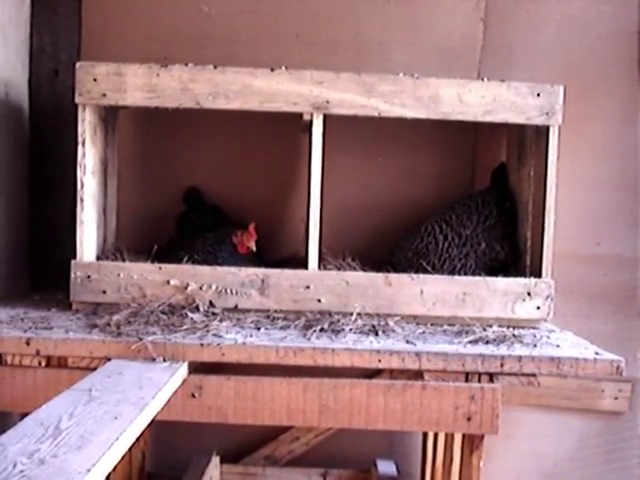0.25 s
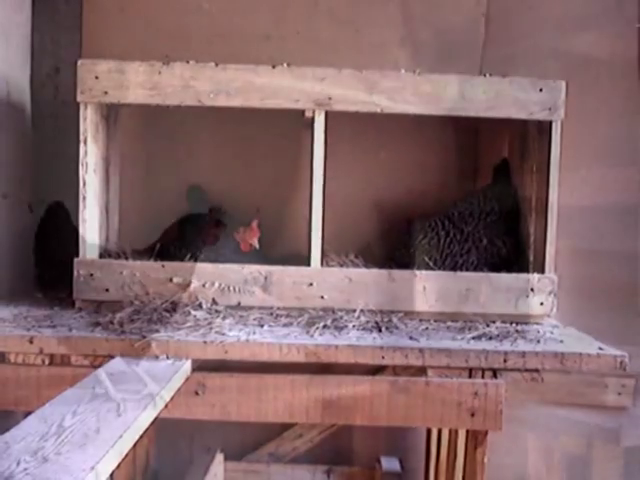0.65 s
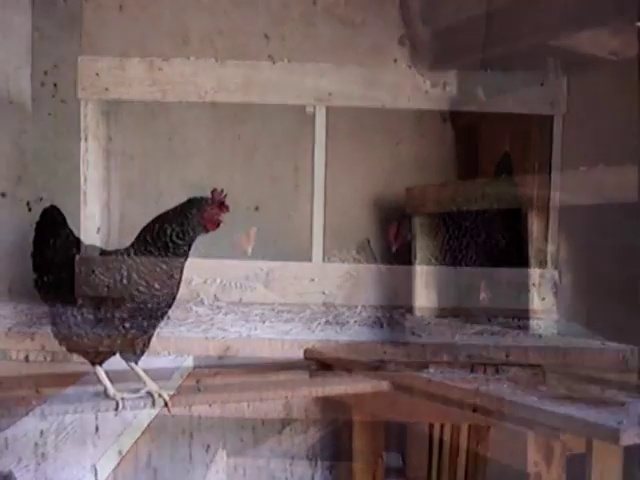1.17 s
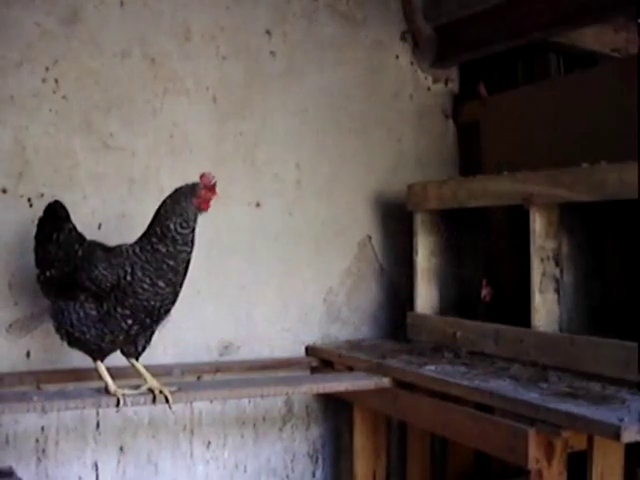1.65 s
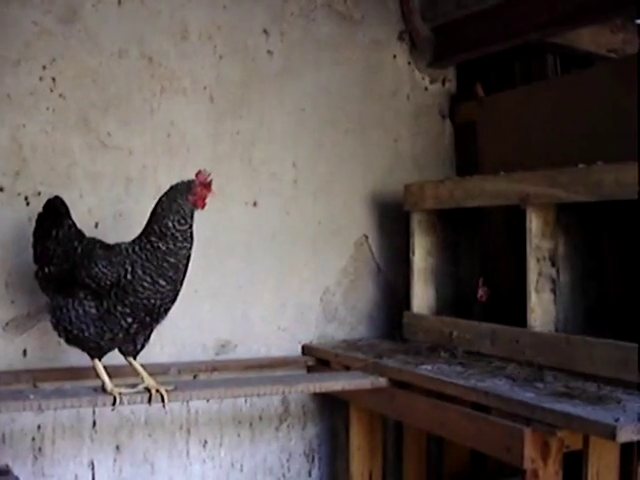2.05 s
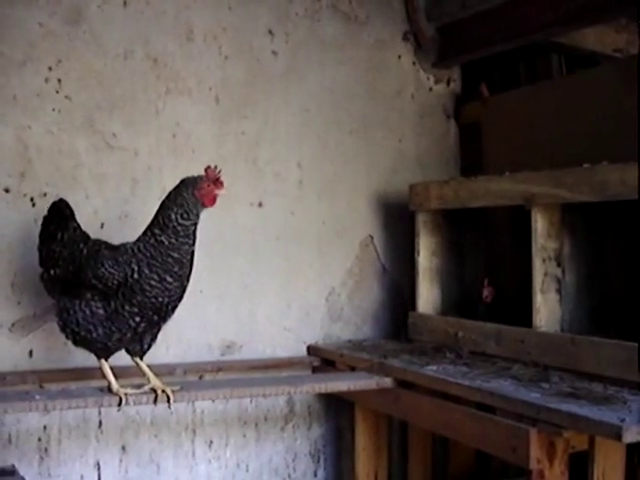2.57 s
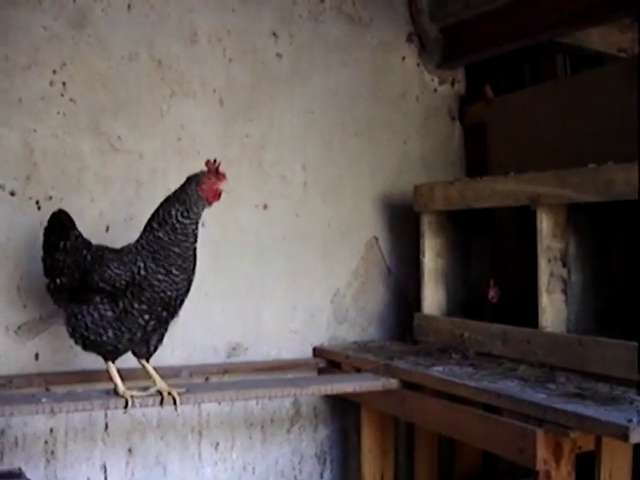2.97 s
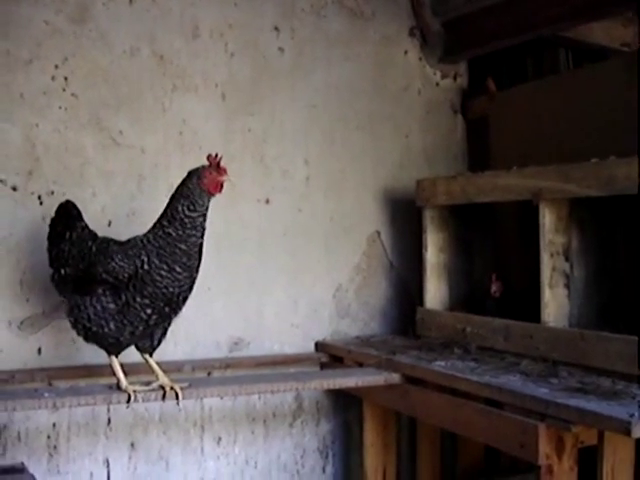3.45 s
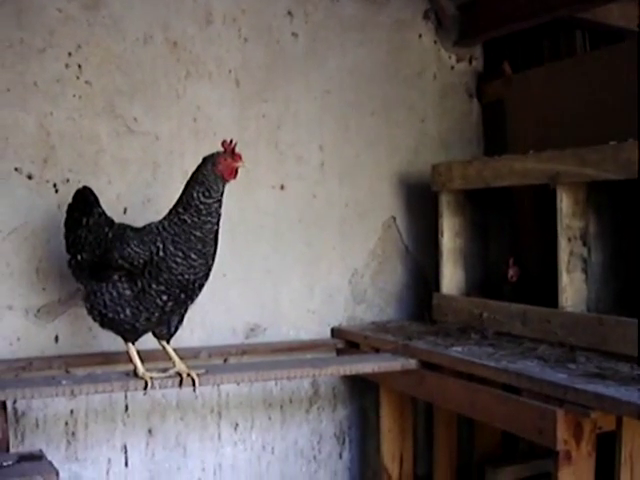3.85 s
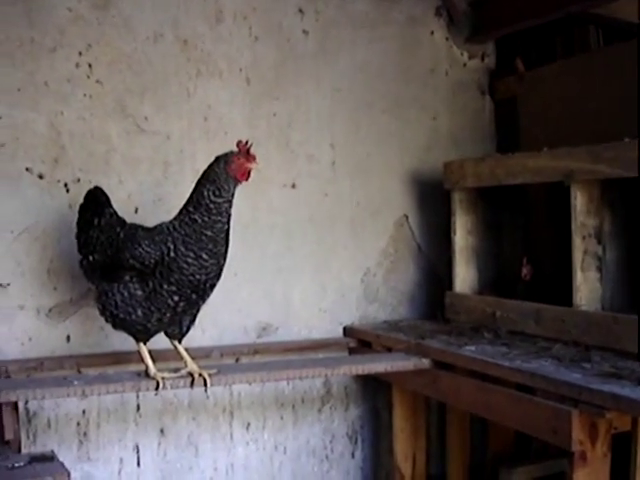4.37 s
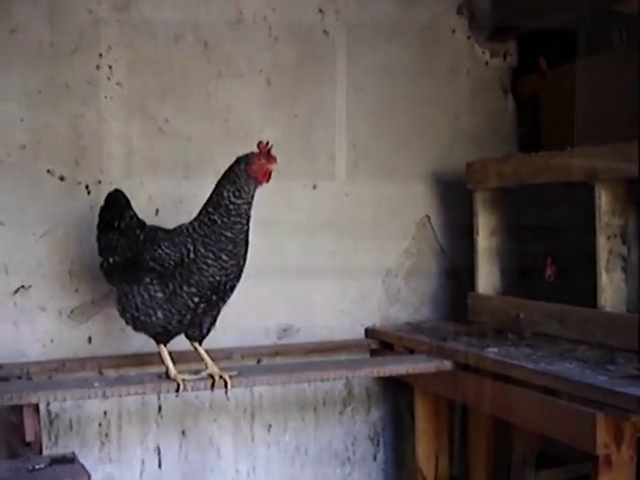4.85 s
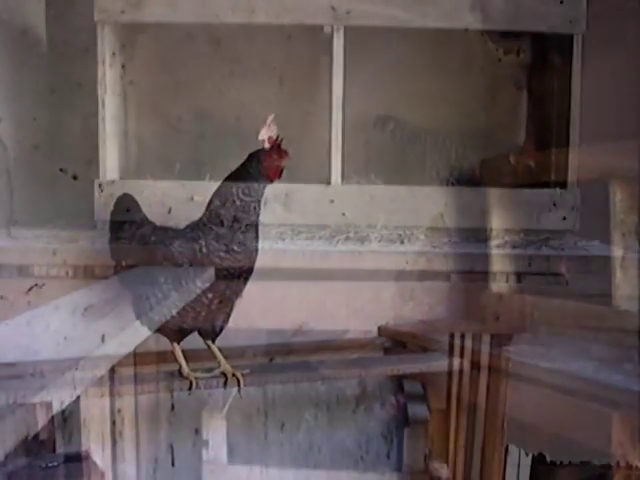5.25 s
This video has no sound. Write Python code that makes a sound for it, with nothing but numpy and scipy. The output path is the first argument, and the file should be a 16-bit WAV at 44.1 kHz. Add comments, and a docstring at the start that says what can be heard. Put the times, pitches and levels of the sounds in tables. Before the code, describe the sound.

A hen cackles near the microphone in a small coop with a short wooden echo. First come a quick hiss, like a sneeze, and a background rumble that dies away as she begins. Her quick, hoarse clucks lead into a drawn-out, brighter call with a rough ending, three times over, with short pauses between. A very faint high whine and quiet room tone lie underneath.

```python
"""Inside a wooden coop, the microphone near a hen on her perch. She cackles in rows of short hoarse
clucks that rise into drawn-out calls: breath shakes the membranes of her syrinx, throat and beak shape
the tone, and the plank walls ring briefly after every note. The camera's thin whine wavers over quiet
air. At the start come a sharp sneeze-like hiss and a louder background rumble, which fades away as
the hen gets going."""
import sys
import numpy as np
from scipy import signal
from scipy.fft import rfft, irfft
from scipy.io import wavfile
from scipy.ndimage import uniform_filter1d

SR = 44100
rng = np.random.default_rng(int(sys.argv[2]) if len(sys.argv) > 2 else 0)


def generate_wav(signal):
    """Clip the signal to [-1, 1] and save it as 16-bit WAV at the path in sys.argv[1]."""
    frames = np.transpose(np.atleast_2d(signal))
    scaled = np.clip(frames, -1, 1) * 32767
    pcm = np.round(scaled).astype(np.int16)
    wavfile.write(sys.argv[1], SR, pcm)


N = 242550
T = np.arange(N) / SR

# Spectra of the coop's room tone, the opening rumble and the hiss: frequency_hz, gain_db
AIR_SPECTRUM = [(12, -30), (25, -8), (120, -6), (280, -3), (800, -7), (1150, -12), (1400, -14), (2200, -22),
                (4000, -23.5), (7800, -24), (10400, -28.5)]
OPENING_RUMBLE_SPECTRUM = [(12, -54.5), (20, -12.5), (139, -9.5), (190, -6.5), (375, -3), (427, -12.5),
                           (541, -6.5), (1100, -11), (1280, -17.5), (7800, -31), (10400, -42), (13500, -64),
                           (22000, -120)]
HISS_SPECTRUM = [(700, -63), (1500, -22.5), (2300, -12.5), (2800, -12.5), (3250, -1), (3800, -9.5),
                 (5300, -13), (6200, -13), (7200, -18), (9700, -18.5), (10400, -32)]
# Drift of the camera's whine: time_s, pitch_hz, level_db
WHINE_PATH = [(0, 3720, -52), (.5, 3520, -89), (1.2, 3580, -62), (2.3, 3360, -61), (3.5, 3610, -59.5),
              (4.3, 3490, -60.5), (5.5, 3500, -69)]
# Soft rustle ahead of the hiss: start_s, length_s, level_db
RUSTLE_NOTES = [(.185, 0.059, -39)]
# The hen's short clucks: start_s, level_db, pitch_hz, length_s, treble_db
CLUCK_NOTES = [(0.591, -28, 291.2, 0.093, 7.5), (0.702, -36.5, 292, 0.084, 18),
               (0.82, -19, 296.8, 0.074, 2), (1.044, -14.5, 294.8, 0.09, 4.5),
               (2.292, -11.5, 288.5, 0.075, -0.5), (2.514, -8, 293.5, 0.07, 4.5),
               (2.727, -4.5, 296.1, 0.072, 2.5), (3.285, -9.5, 291.9, 0.088, 5),
               (4.134, -12, 291.2, 0.072, 1.5), (4.344, -9.5, 294, 0.077, 4),
               (4.565, -8.5, 292.3, 0.087, 3), (4.786, -7, 292.6, 0.076, 4), (4.996, -9, 290.8, 0.091, 3.5)]
# Throat resonances with the beak nearly shut, and open: frequency_hz, gain_db
THROAT_SHUT = [(150, -46), (290, -19), (450, -20), (600, -9), (850, 3.5), (1170, 1), (1500, -18.5),
               (1850, -12.5), (2300, -22), (2800, -19.5), (3500, -30.5), (5500, -38.5), (9500, -43.5),
               (10400, -63.5)]
THROAT_OPEN = [(150, -76.5), (270, -43.5), (520, -14), (800, -6.5), (1060, 4.5), (1320, -12.5), (1600, -11),
               (2100, -16), (2700, -18), (3200, -24.5), (4400, -30.5), (6500, -36.5), (8400, -43),
               (10400, -39)]
# Time the plank walls' echoes take to fall 60 dB: frequency_hz, decay_s
COOP_DECAY = [(250, 0.46), (1000, 0.28), (3000, 0.29), (9000, 0.22)]
# Open-beaked calls; the pitches lie an octave below the main tone, inner times count from start_s:
# start_s, length_s, level_db, attack_s, first_hz, low_hz, low_s, push_s, push_db,
# odd_peak_db, odd_peak_s, brass_db, treble_db, hoarseness (0-1), catch_s
CALL_NOTES = [(1.216, 0.33, -14, 0.0079, 282.7, 258.7, 0.19, .24, 9, 0.5, .11, 1.5, 3, 0.11, 0.033),
              (1.608, .095, -12.5, 0.023, 264.2, 258.6, .06, .03, 3, 1.5, 0.024, -6, -5, 0.32, 0.052),
              (2.891, .31, -9.5, 0.0077, 283.9, 258.4, .155, .228, 6, -1, 0.11, 2, 2.5, .12, 0.06),
              (5.147, .28, -14.5, 0.013, 287, 254.9, .15, .22, 5, -9, .04, 3.5, 2, 0.23, 0.049)]

OPENING_FADE = np.interp(T, (0.67, 1.55), [1, 0])


def undb(db):
    """Decibels to amplitude."""
    return 10 ** (np.asarray(db) / 20)


def level(x, db):
    """Scale to an RMS level."""
    return x * undb(db) / np.sqrt(np.mean(x ** 2))


def ramp(x):
    """Hold between 0 and 1."""
    return np.clip(x, 0, 1)


def bump(t, at, width):
    """Bell of height 1."""
    return np.exp(-.5 * ((t - at) / width) ** 2)


def colour(table, hz):
    """A spectrum's gain in dB at the given frequencies."""
    f, db = np.transpose(table)
    return np.interp(np.log(np.maximum(hz, 1)), np.log(f), db)


def tint(x, table):
    """Filter by a spectrum table."""
    return irfft(rfft(x) * undb(colour(table, np.fft.rfftfreq(len(x), 1 / SR))), len(x))


def butter(x, order, hz, kind):
    """Band-pass or high-pass filter."""
    return signal.sosfilt(signal.butter(order, hz, kind, fs=SR, output="sos"), x)


def noise_band(size, hz, width_hz):
    """Noise centred on hz."""
    return butter(rng.standard_normal(size), 2, [hz - width_hz / 2, hz + width_hz / 2], "band")


def walk(rate_hz, size=N):
    """Smooth random wander with a spread near 1."""
    hold = max(int(SR / rate_hz), 1)
    steps = np.repeat(rng.standard_normal(size // hold + 1), hold)
    return 1.483 * uniform_filter1d(uniform_filter1d(steps, hold), hold)[:size]


def coop_air():
    """Room tone all round the microphone; a louder opening rumble swells once and fades away."""
    steady = level(tint(rng.standard_normal(N), AIR_SPECTRUM), db=-50) * undb(.6 * walk(4))
    rumble = level(tint(rng.standard_normal(N), OPENING_RUMBLE_SPECTRUM), db=-41.5)
    swell_db = 4.5 * bump(T, at=.3, width=.072) + walk(13.6)
    return steady + OPENING_FADE * rumble * undb(swell_db)


def camera_whine(frame_hz=29.97, sweep_hz=190):
    """The camera's whine sags and snaps back once a frame, over a hum and high ticks that soon fade."""
    time_s, *columns = np.transpose(WHINE_PATH)
    hz, db = [np.interp(T, time_s, column) for column in columns]
    sag = uniform_filter1d(.5 - (frame_hz * (T - 3.719)) % 1, 260)
    phase = 2 * np.pi * np.cumsum(hz + sweep_hz * sag + 15 * walk(90)) / SR
    whine = (np.sin(phase) + undb(-22) * np.sin(2 * phase)) * undb(2.6 * walk(71))
    hum = undb(-60.5) * np.sin(2 * np.pi * frame_hz * T)
    throb = ramp(np.cos(2 * np.pi * frame_hz * (T - .545)))
    ticks = throb * noise_band(N, hz=8100, width_hz=220)
    tick_db = -77 + 8 * bump(T, at=.65, width=.2)
    return level(whine, db) + hum + OPENING_FADE * level(ticks, tick_db)


def hiss(start_s=.2533, attack_s=.011, hold_s=.039, fall_db_per_s=140):
    """A sneeze-like burst of grainy air peaking near 3 kHz, with a softer rustle before it."""
    t = T - start_s
    envelope = ramp(t / attack_s) ** 2 * undb(-20 - fall_db_per_s * np.maximum(t - hold_s, 0))
    for onset_s, length_s, db in RUSTLE_NOTES:
        envelope += undb(db) * ramp((T - onset_s) / .012) * ramp((onset_s + length_s - T) / .01 + 1)
    grain = rng.standard_normal(N) * undb(1.3 * walk(89))
    return envelope * level(tint(grain, HISS_SPECTRUM), 0)


def syrinx(hz, odd_db, brass_db, treble_db, rough, throat):
    """Membrane partials through the throat; roughness shakes the period and adds a puff each cycle."""
    n, rough = len(hz), np.clip(rough, 0, .98)
    phase = 2 * np.pi * np.cumsum(hz * (1 + .0495 * rough * walk(161.2, n))) / SR
    order = np.arange(1, 36)[:, None]
    treble_band = ramp(2 * np.log2(order * hz / 2800))
    brass_band = ramp(3 * np.log2(order * hz / 1200)) - treble_band
    lift_db = brass_db * brass_band + treble_db * treble_band
    # each partial wavers on its own in level and phase, blurring the high ones most
    swell_db = np.array([walk(35, n) for _ in order]) * np.minimum(.5 * order, 3.5)
    slip = np.array([walk(260, n) for _ in order]) * (.03 * order + .001 * order ** 2)
    # alternating strong and weak cycles give the odd partials
    gain = undb(colour(throat, order * hz) + odd_db * (order % 2) + lift_db + swell_db)
    tone = np.sum(gain * np.sin(order * phase + slip + rng.uniform(0, 2 * np.pi, order.shape)), axis=0)
    tone /= np.sqrt(np.sum(gain ** 2, axis=0) / 2)
    puffs = rng.standard_normal(n) * (1 + .69 * np.cos(phase))
    breath = tint(puffs, throat)
    breath = level(breath + (undb(treble_db + 4) - 1) * butter(breath, 2, 2400, "high"), 0)
    flutter = undb(1.98 * walk(62.1, n))
    voice = np.sqrt(1 - rough) * tone + np.sqrt(rough) * breath
    # breath pressure holds the loudness steady over a few cycles
    return flutter * voice / np.sqrt(uniform_filter1d(voice ** 2, 700) + .05)


def clucks():
    """Short pushes with the beak nearly shut; the treble blooms in the middle and the pitch sags."""
    out = np.zeros(N)
    for start_s, level_db, pitch_hz, length_s, treble_db in CLUCK_NOTES:
        progress = np.linspace(0, 1, int(length_s * SR))
        edges = ramp(progress / .05) * ramp((1 - progress) / .5)
        effort = edges * (.11 + .62 * ramp(progress / .29))
        voice = syrinx(pitch_hz * (1.01 - .0318 * progress), odd_db=0,
                       brass_db=treble_db - 6 * (1 - effort), treble_db=treble_db - 12 * (1 - effort),
                       rough=.47, throat=THROAT_SHUT)
        i = int(start_s * SR)
        out[i:i + len(voice)] += undb(level_db) * effort * voice
    return out


def coop_ring(hen, echo_db=-8):
    """The hen reaches the microphone directly and off plank walls, whose treble echoes die sooner."""
    t = np.arange(int(.7 * SR)) / SR
    hz, decay_s = np.transpose(COOP_DECAY)
    tail = np.zeros(len(t))
    for centre_hz in 250 * 2 ** np.arange(0, 5.6, .5):
        fall = undb(-60 * t / np.interp(np.log(centre_hz), np.log(hz), decay_s))
        tail += fall * noise_band(len(t), centre_hz, centre_hz / 2.98)
    tail *= ramp(t / .0066)
    # her head keeps turning, so what reaches the walls wavers and its partials spread
    sent = np.real(signal.hilbert(hen) * np.exp(.9j * walk(60)))
    return hen + undb(echo_db) * signal.fftconvolve(sent, tail / np.sqrt(np.sum(tail ** 2)))[:N]


def long_calls(push_width_s=.016, rebound_hz_per_s=97.5, release_db_per_s=220, dulling_db_per_s=248):
    """Beak open, an octave up: a bark, a catch, a slide down, a last bright push, a hoarse dull end."""
    out = np.zeros(N)
    for (start_s, length_s, level_db, attack_s, first_hz, low_hz, low_s, push_s, push_db,
         odd_peak_db, odd_peak_s, brass_db, treble_db, hoarseness, catch_s) in CALL_NOTES:
        t = np.arange(int(length_s * SR)) / SR
        bark = ramp(1 - t / .038)
        catch = bump(t, catch_s, width=.0091)
        swell = bump(t, low_s, width=.027)  # loud and round at the bottom of the slide
        release_s = np.maximum(t - push_s - push_width_s, 0)
        broken = ramp(release_s / .012)  # the voice breaks after the last push
        hz = np.interp(t, [0, low_s], [first_hz, low_hz])
        hz += rebound_hz_per_s * np.clip(t - low_s, 0, max(push_s - low_s, 0))
        hz *= 1 - .06 * ramp(release_s / release_s[-1])
        accent_db = 3 * bark - 4.5 * catch + 2.5 * swell - 3.5 * broken
        edges = ramp(t / attack_s) * ramp((length_s - t) / .013)
        envelope = edges * undb(level_db + accent_db - release_db_per_s * release_s)
        odd_db = odd_peak_db - 14 * (1 - bump(t, odd_peak_s, width=.046))
        bright_db = push_db * bump(t, push_s, push_width_s) - 3.5 * swell
        brass = brass_db + bright_db - 7.5 * bark
        treble = treble_db + bright_db - dulling_db_per_s * release_s
        rough = .019 + hoarseness * ramp(1 - t / low_s) ** 2 + .45 * bark + .65 * broken
        i = int(start_s * SR)
        out[i:i + len(t)] = envelope * syrinx(hz, odd_db, brass, treble, rough, THROAT_OPEN)
    return out


def scene():
    """Everything that reaches the one microphone in the coop."""
    hen = butter(clucks() + long_calls(), 3, 200, "high")
    return (coop_ring(hen) + hiss() + camera_whine() + coop_air())[None]


def record(dry):
    """Behind the microphone, gain control holds down loud notes; peaks are rounded, the top cut steeply."""
    threshold_db, top_hz = -13, 10120
    loud_db = 10 * np.log10(uniform_filter1d(dry[0] ** 2, 900) + 1e-12)
    held = dry * undb(-.6 * np.maximum(loud_db - threshold_db, 0))
    soft = np.tanh(1.09 * held) / 1.065
    return signal.sosfilt(signal.ellip(12, .3, 60, top_hz, fs=SR, output="sos"), soft)


dry = scene()
out = record(dry)
generate_wav(out)
```